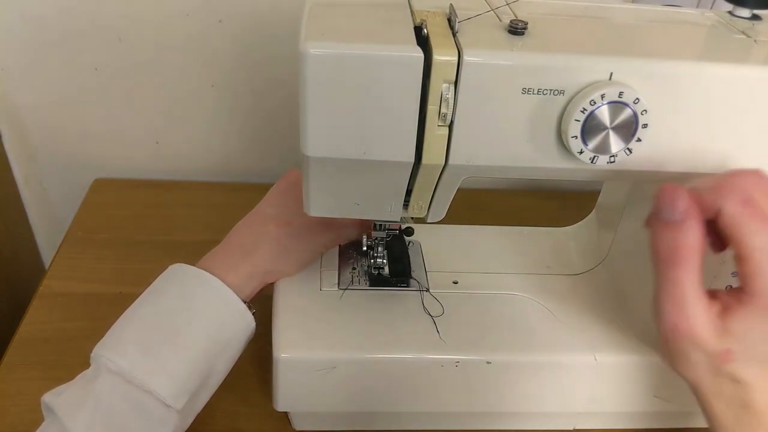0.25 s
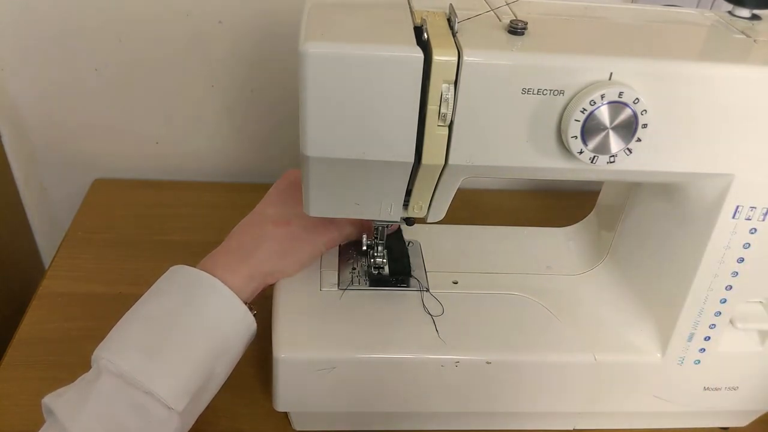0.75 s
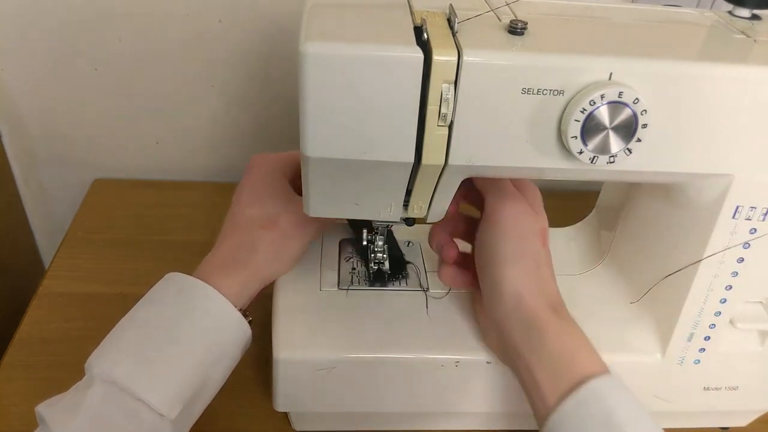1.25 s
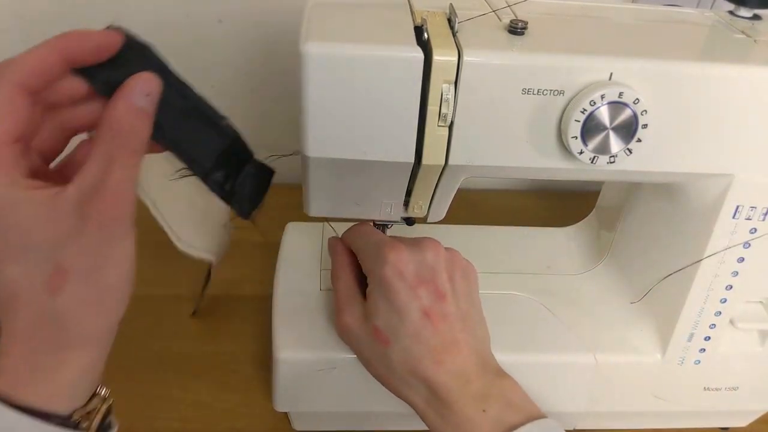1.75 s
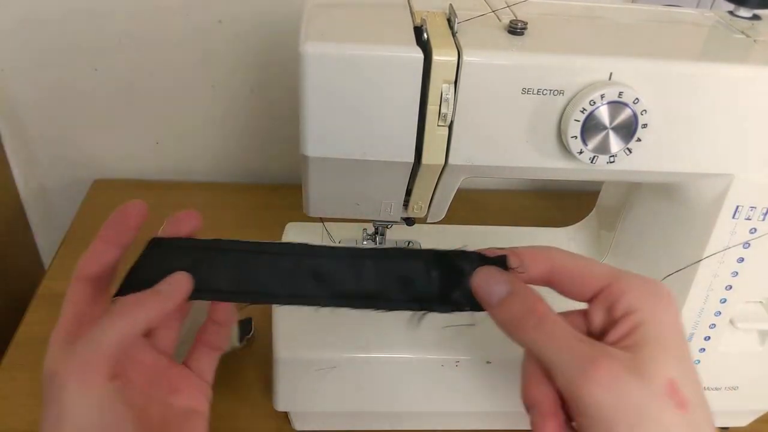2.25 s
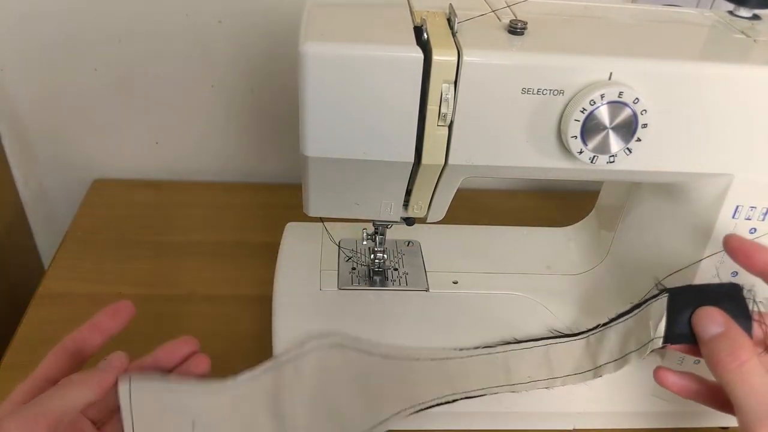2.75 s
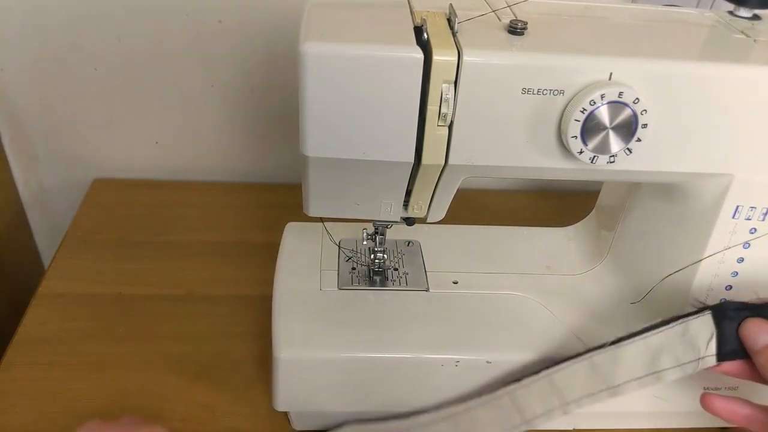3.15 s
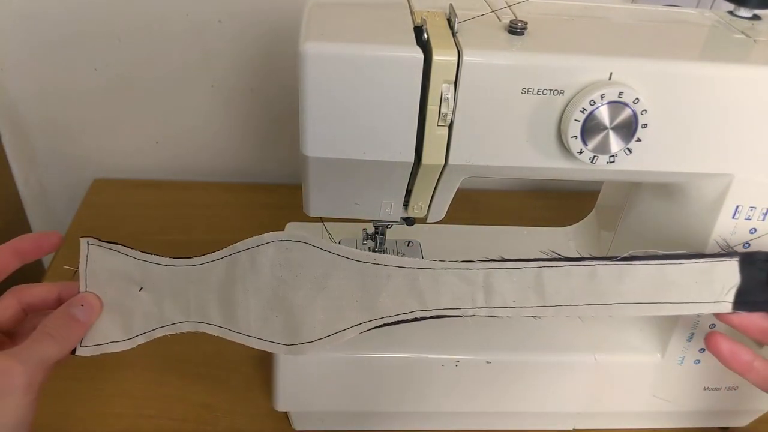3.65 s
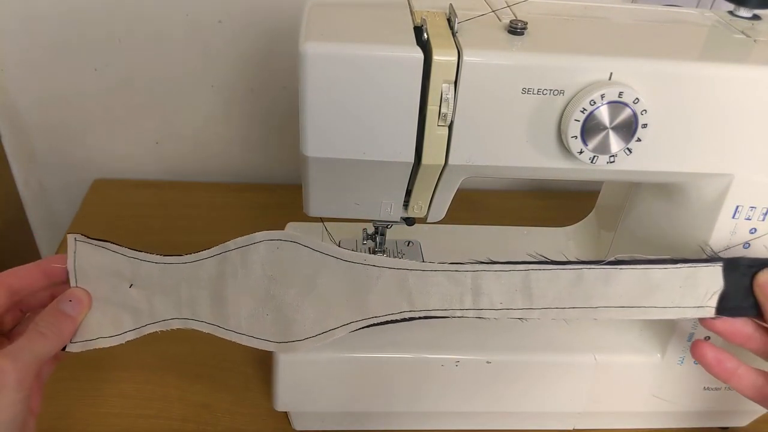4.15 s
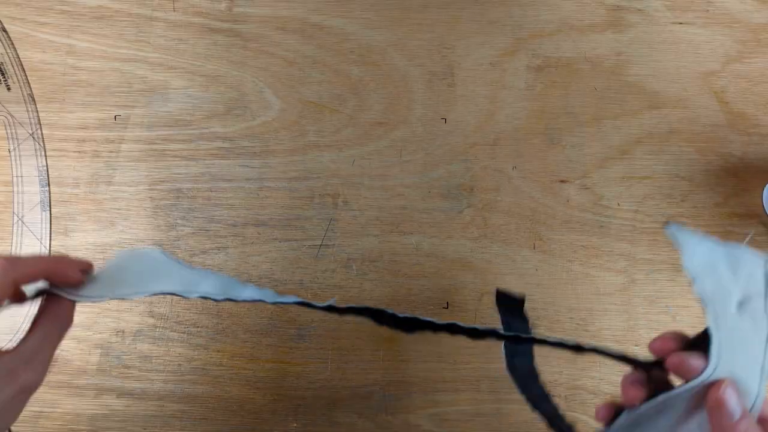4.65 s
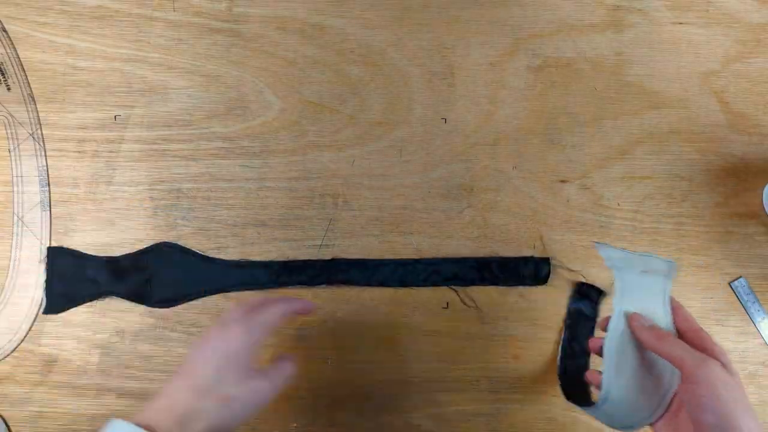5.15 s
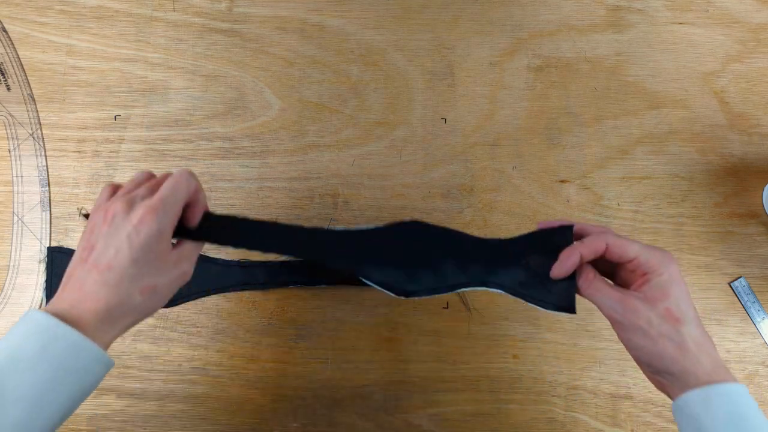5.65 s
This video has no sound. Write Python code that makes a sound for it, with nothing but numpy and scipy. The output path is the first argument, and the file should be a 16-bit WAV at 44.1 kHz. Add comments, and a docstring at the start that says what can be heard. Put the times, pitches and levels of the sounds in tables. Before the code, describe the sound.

Close steel snips and faint fabric rustle in a quiet humming room, followed by table taps, a tiny tick, and airy cloth swishes on the right.

```python
"""A quiet sewing room heard from close by: small steel scissors are handled and snip threads, cloth rustles,
the building hums low. At 4.4 s the scene changes: the sewing sounds stop and the air by a wooden table sets in
at once: its rumble and air, light taps, a tick, sliding cloth, and swishes of cloth on the right that the table
top mirrors. Friction and air are shaped noise, contacts are decaying noise bursts with rings, and the mirror is
a delayed copy of the swish."""
import sys
import numpy as np
from scipy import signal
from scipy.fft import rfft, irfft
from scipy.io import wavfile
from scipy.ndimage import uniform_filter1d, map_coordinates

SR = 44100
rng = np.random.default_rng(int(sys.argv[2]) if len(sys.argv) > 2 else 0)


def to_wav(sig):
    """Store sig (one row per channel, or 1-D mono) as 16-bit WAV at the path in sys.argv[1].

    Samples outside -1..1 are clipped; the rate is SR.
    """
    pcm = np.clip(np.atleast_2d(sig), -1, 1) * 32767
    pcm = np.round(pcm).astype(np.int16)
    wavfile.write(sys.argv[1], SR, pcm.T)  # frames by channels


def linear_from_db(decibels):
    """Turn decibels (scalar or array-like) into linear amplitude factors; 0 gives 1."""
    return 10 ** (np.asarray(decibels, float) / 20)


N = 260190
T = np.arange(N) / SR


def unit(x):
    """Power normalisation: scaled to rms 1."""
    return x / np.sqrt(np.mean(x ** 2))


def curve(rows):
    """Piecewise-linear envelope: the columns of a table joined by straight lines in time."""
    s, *columns = np.transpose(rows)
    return [np.interp(T, s, column) for column in columns]


def shape(points):
    """Transfer function: gain at every spectral line from (Hz, dB) points."""
    hz, db = np.transpose(points)
    line_hz = np.fft.rfftfreq(N, 1 / SR)
    return linear_from_db(np.interp(np.log(line_hz + 1), np.log(hz), db))


def filtered(x, points):
    """Linear filtering: the spectrum of x times the gains of (Hz, dB) points."""
    return irfft(rfft(x) * shape(points), N)


def coloured(points):
    """Spectral shaping: white noise given the spectrum of (Hz, dB) points."""
    return filtered(rng.standard_normal(N), points)


def band(x, lo_hz, hi_hz):
    """Band-pass filtering: a second-order Butterworth design, kept within 20 Hz to 20 kHz."""
    edges_hz = [max(lo_hz, 20), min(hi_hz, 20000)]
    return signal.sosfilt(signal.butter(2, edges_hz, "band", fs=SR, output="sos"), x)


def ring(x, hz, t60):
    """Modal resonance: a two-pole mode decays 60 dB in t60 s, peak near 1 for a unit blow."""
    radius, angle = np.exp(-np.log(1000) / (t60 * SR)), 2 * np.pi * hz / SR
    return signal.lfilter([0, np.sin(angle)], [1, -2 * radius * np.cos(angle), radius ** 2], x)


def walk(rate):
    """Slow random modulation: rate levels a second joined by ramps, spread about 0.4."""
    k = int(SR / rate)
    held = np.repeat(rng.standard_normal(N // k + 1), k)
    return 0.52 * uniform_filter1d(held, k)[:N]


def stroke(start, end, edge_s):
    """Smooth gating: a movement starts and stops with sine-squared edges of edge_s."""
    return np.sin(np.pi / 2 * np.clip(np.minimum(T - start, end - T) / edge_s, 0, 1)) ** 2


def clatter(t60, rise_s):
    """Granular impact: a swarm of tiny uneven contacts builds up over rise_s, then dies away."""
    t = np.arange(int(0.2 * SR)) / SR
    grit_db = 1.8 * rng.exponential(size=len(t))  # single contacts differ in strength
    contacts = unit(rng.standard_normal(len(t)) * linear_from_db(grit_db))
    after_s = np.maximum(t - rise_s, 0)
    fall = np.exp(-np.log(1000) * after_s / np.clip(t60, 0.01, 0.4))
    bite, bite_s = 0.49, 0.0042  # extra strength of the first contacts, and how fast it is gone
    fall = fall * (1 + bite * np.exp(-after_s / bite_s)) / (1 + bite)
    return contacts * np.minimum(t / rise_s, 1) ** 2 * fall


def add(out, x, s):
    """Superposition: mixes x into out from time s."""
    i = int(s * SR)
    out[i:i + len(x)] += x[:len(out) - i]


# hum spectrum: pitch_hz, level_db (per Hz, relative)
HUM_COLOUR = [(12, -41), (20, -11.5), (50, 4), (91, -2), (115, 0.5), (135, -4), (158, -16.5), (240, -17.5),
              (328, -32), (410, -27.5), (500, -32), (1090, -43), (1860, -45.5), (4300, -55), (6400, -51.5),
              (9000, -60), (12500, -62), (16000, -86.5)]
# wavering tones in the hum: pitch_hz, width_hz, level_db (relative to the hum noise)
HUM_TONES = [(50.95, 16, -17), (116, 9.6, -11), (255, 70, -24), (1550, 120, -41)]
# stereo width of the hum: pitch_hz, side_minus_mid_db
HUM_SIDE = [(60, -27.5), (200, -17), (700, -9.5), (2400, -6), (4400, 2.5), (15000, -7.5)]
# swells of the hum: time_s, level_db (of its noise, before the tones are added)
HUM_LEVEL = [(0, -51.5), (1.85, -52.5), (2.05, -49), (2.6, -50.5), (3.2, -52), (3.7, -49), (5.9, -50)]


def hum():
    """Mid and side noise: low building hum with narrow-band tones, alike in the bass, wide in the treble."""
    mid = unit(coloured(HUM_COLOUR))
    tones = 0
    for hz, width_hz, db in HUM_TONES:
        tones = tones + linear_from_db(db) * unit(band(rng.standard_normal(N), hz - width_hz / 2, hz + width_hz / 2))
    mid = mid + tones
    side = filtered(unit(coloured(HUM_COLOUR)), HUM_SIDE)
    return linear_from_db(curve(HUM_LEVEL)[0]) * (mid * linear_from_db([[-0.5], [0.5]]) + side * np.array([[1], [-1]]))


def rubbed(noise, rows, ring_db, width):
    """Friction noise: each stroke adds one broad ring, width being its half-width as a share of its pitch."""
    out = 0
    for start, end, db, hz in rows:
        i, j = int(start * SR), int(end * SR)
        grains = noise[:, i:j]
        x = np.zeros((2, N))
        x[:, i:j] = grains + linear_from_db(ring_db) * band(grains, hz * (1 - width), hz * (1 + width))
        out = out + linear_from_db(db) * stroke(start, end, min(0.07, 0.46 * (end - start))) * x
    return out


def crackle():
    """Stick-slip: gain leaps at each snapping crease and dies in a few ms."""
    per_s, size_db, decay_s = 90, -7, 0.002
    snaps = (rng.random(N) < per_s / SR) * linear_from_db(size_db) * rng.exponential(size=N)
    return 1 + signal.lfilter([1], [1, -np.exp(-1 / (decay_s * SR))], snaps)


# spectrum of rubbed cloth: pitch_hz, level_db (per Hz, relative)
CLOTH_COLOUR = [(400, -12.5), (900, -6), (1670, -5.5), (3600, -2.5), (7000, -8), (11000, -8), (14500, -11),
                (16500, -27)]


def friction():
    """Stick-slip friction: fibres and blades slip in dense grains that flicker band by band."""
    noise = np.array([unit(coloured(CLOTH_COLOUR)) for _ in range(2)])
    rubbing = rustle(noise) + rubs(noise) + grinds(noise)
    # each region of the spectrum has its own grip and its own snapping creases
    below = []
    for hz in 1500 * 1.4 ** np.arange(7):
        below.append(signal.sosfiltfilt(signal.butter(4, hz, fs=SR, output="sos"), rubbing))
    out = below[0]
    for part in np.diff(below + [rubbing], axis=0):
        grip_db = 3.5 * walk(60) + 8 * walk(22)  # quick flicker and slow patches
        out = out + part * linear_from_db(grip_db) * crackle()
    out = out * linear_from_db(2.0 * walk(45) + 1.1 * walk(300))
    mid, side = out
    return mid + linear_from_db(-21) * side * np.array([[1], [-1]])


# cloth and fingers rubbing: start_s, end_s, level_db (before ring and flicker), pitch_hz (of the ring)
RUSTLES = [(0, 0.046, -62, 7500), (0.29, 0.354, -74, 2000), (0.338, 0.467, -79.5, 5070),
           (0.427, 0.546, -65.5, 3050), (0.559, 0.705, -65, 5950), (0.657, 0.853, -81.5, 4000),
           (0.803, 0.873, -72, 2820), (0.985, 1.077, -72, 1900), (1.03, 1.18, -75.5, 4200),
           (1.153, 1.253, -71.5, 5500), (1.204, 1.343, -75, 7100), (1.509, 1.543, -63.5, 7800),
           (1.555, 1.63, -68, 2600), (1.646, 1.743, -58.5, 2480), (1.73, 1.922, -61, 2600),
           (2.12, 2.3, -79, 2410), (2.232, 2.338, -63.5, 4050), (2.307, 2.407, -70, 4620),
           (2.35, 2.525, -60.5, 2964), (2.491, 2.653, -78, 5000), (2.794, 2.847, -76, 2220),
           (2.826, 3.124, -77.5, 4500), (3.564, 3.76, -73, 4330), (3.768, 3.836, -68, 3140),
           (4.106, 4.37, -74, 3030)]


def rustle(noise):
    """Friction of fibres: cloth and fingers rub with a faint ring from what is rubbed."""
    return rubbed(noise, RUSTLES, ring_db=-3, width=0.09)


# contacts of the scissors: start_s, level_db (before the bands), pitch_hz (main ring),
# body_db (relative), t60_s (of the clatter, at least 0.01)
SNIPS = [(0.0193, -46, 7600, -21, 0.0097), (0.5946, -47, 10200, -6.5, 0.028),
         (0.617, -50.5, 9600, -8, 0.03), (0.636, -43, 6160, -11, 0.043), (0.968, -62, 2880, -2, 0.058),
         (0.996, -63, 5500, -3, 0.023), (1.014, -57.5, 2470, -8, 0.046), (1.205, -52.5, 3600, -11, 0.04),
         (1.478, -51.5, 2780, -6.5, 0.053), (1.518, -55, 7980, -10, 0.022), (1.5659, -55, 4870, -4, 0.04),
         (1.603, -57, 9500, -12, 0.03), (1.631, -43, 4000, -14, 0.069), (1.678, -42, 2080, -10, 0.094),
         (1.683, -34, 8100, -20, 0.025), (1.707, -44, 8550, -11, 0.036), (1.750, -51, 3900, -17, 0.1),
         (1.79, -45, 10500, -8, 0.036), (1.796, -38.5, 2890, -19, 0.049), (1.808, -48, 10300, -12, 0.022),
         (1.8207, -35.5, 2460, -18, 0.045), (1.84, -44, 6160, -16, 0.033), (1.8626, -53, 8500, -20, 0.064),
         (1.9732, -51, 2700, -14, 0.035), (2.2541, -28.5, 2400, -8.5, 0.049),
         (2.3783, -30, 3050, -9, 0.097), (2.3848, -26.5, 2730, -7.5, 0.086),
         (2.395, -35.5, 9040, -20, 0.056), (2.405, -39, 4990, -8, 0.048), (2.455, -50, 3000, -6, 0.072),
         (2.5965, -50.5, 3150, -15, 0.048), (2.82, -56.5, 2180, -4, 0.036), (2.987, -57, 4070, -5, 0.03),
         (3.0666, -36.5, 2420, -6, 0.041), (3.0981, -36, 2200, -1.5, 0.035),
         (3.102, -37.5, 2880, -13, 0.041), (3.109, -51, 8500, -8, 0.026), (3.237, -63, 2270, -0.5, .051),
         (3.754, -33.5, 2330, -5, 0.014), (3.7576, -28, 6900, -12, 0.018), (3.761, -35, 5930, -9, 0.019),
         (3.77, -35.5, 3090, -4.5, 0.039), (3.8414, -42, 9800, -12.5, 0.02), (4.161, -66, 2310, 9.5, 0.078),
         (4.334, -65.5, 3020, 6, 0.033)]


def scissors():
    """Impact excitation: contacts clatter in body, blade and edge bands, with main and chance rings."""
    out = np.zeros(N)
    rise_s = 0.0023
    for s, level_db, hz, body_db, t60 in SNIPS:
        octaves = np.log2(hz / 5000)
        edge_db = -4 + 2 * octaves - 0.21 * body_db  # brighter for high rings, duller for heavy bodies
        hump_db, hump_width = 2 * octaves, 0.12  # broad lift around the ring
        x = clatter(t60, rise_s)
        body = linear_from_db(body_db + 3.5) * band(band(x, 810, 4700), 780, 5700)
        blade = linear_from_db(1) * band(x, 4320, 6330)
        knock = linear_from_db(body_db - 4.5) * band(x, 1000, 1510)  # the handles' hollow knock
        edge = linear_from_db(edge_db) * band(x, 7730, 13160)
        hump = linear_from_db(hump_db) * band(x, hz * (1 - hump_width), hz * (1 + hump_width))
        wide = body + blade + knock + edge + hump
        # grip and pivot play differ at every blow, so short rings fall at new pitches
        chance = sum(ring(wide, f, 0.0083) for f in 2000 + 12500 * rng.random(size=5))
        contact = wide + linear_from_db(-29) * chance + linear_from_db(-29) * ring(x, hz, 0.012)
        add(out, linear_from_db(level_db) * contact, s - 0.65 * rise_s)
    return out


def room(x):
    """Reverberation: early scatter and a short tail, different in each ear."""
    t60_s, room_db = 0.19, -7.5
    t = np.arange(int(0.4 * SR)) / SR
    decay = np.exp(-np.log(1000) * t / t60_s) + 0.96 * np.exp(-t / 0.0088)
    tail = rng.standard_normal((2, len(t))) * decay
    tail = tail / np.sqrt(np.sum(tail ** 2, axis=1, keepdims=True))
    return linear_from_db(room_db) * signal.fftconvolve(x[None], tail, axes=1)[:, :N]


# low hollow rubs, perhaps a hand on the machine's casing:
# start_s, end_s, level_db (before ring and flicker), pitch_hz (of the ring)
HOLLOW_RUBS = [(1.09, 1.21, -74, 1080), (2.3, 2.4, -69, 1150), (2.934, 3.035, -77.5, 915),
               (3.709, 3.77, -70.5, 1140), (3.747, 3.81, -63.5, 696)]


def rubs(noise):
    """Resonant friction: low hollow rubs with a strong, broad ring."""
    return rubbed(noise, HOLLOW_RUBS, ring_db=16, width=0.24)


# blades grinding past each other: start_s, end_s, level_db (before ring and flicker), pitch_hz (of the ring)
BLADE_GRINDS = [(1.69, 1.712, -69, 3000), (1.702, 1.734, -71, 2500), (1.749, 1.775, -68, 2600),
                (1.746, 1.77, -71, 8250)]


def grinds(noise):
    """Friction-driven resonance: blades grind past each other and sing briefly in a narrow band."""
    return rubbed(noise, BLADE_GRINDS, ring_db=24, width=0.04)


# blades meeting fully: start_s, level_db (of the blow)
SHUTS = [(2.391, -52), (2.455, -62), (3.761, -60)]
# lasting ring of the steel: pitch_hz, t60_s
STEEL_RING = (7505, .2)


def blade_ring():
    """Modal resonance: blades that meet fully set off one lasting mode of the steel."""
    blows = np.zeros(N)
    for s, db in SHUTS:
        add(blows, linear_from_db([db]), s)
    return ring(blows, *STEEL_RING)


# spectrum of the air by the table: pitch_hz, level_db (per Hz, relative)
AIR_COLOUR = [(120, -13), (300, -4.5), (500, -6.5), (1230, -8.5), (2200, -13), (2800, -13), (2960, -8.5),
              (3150, -16), (16000, -30.5)]


def table_bed():
    """Shaped noise: slow rumble and air by the table; both rise while hands lean on it."""
    from_s = 4.403  # the air sets in at once, the rumble fades in
    lean = stroke(5.62, 5.98, 0.18)  # hands lean on the table while dragging
    rumble_db, air_db = -47 + 2.5 * lean, -63.5 + 2.5 * lean
    air = coloured(AIR_COLOUR)
    air = air / np.sqrt(np.mean(band(air, 400, 3500) ** 2))
    air = (T > from_s) * linear_from_db(air_db + 1.0 * walk(25)) * air
    rumble = unit(coloured([(2, -37), (5, -13), (14, 10.0), (30, -24), (120, -48), (500, -94)]))
    return air + stroke(from_s, N / SR + 1, 0.077) * linear_from_db(rumble_db) * rumble


# taps on the table: start_s, peak_db, pitch_hz (of the ring), width_hz, t60_s (at least 0.01)
TAPS = [(4.432, -55, 12400, 6000, 0.024), (4.664, -50.5, 1300, 2000, 0.028),
        (4.784, -51.5, 1210, 1800, .03), (4.86, -48, 3400, 3400, 0.17), (4.912, -42.5, 2440, 4130, 0.12),
        (5.346, -48, 720, 350, 0.14), (5.360, -42, 705, 348, 0.072), (5.546, -41, 400, 676, 0.011),
        (5.706, -44.5, 1270, 600, 0.3), (5.707, -43, 398, 400, 0.028)]


def taps():
    """Impact on wood: a band of decaying clatter led by a quicker tick, scaled to its peak."""
    out = np.zeros(N)
    for s, peak_db, hz, width_hz, t60 in TAPS:
        x = clatter(t60, rise_s=0.0028)
        tick = band(clatter(0.026, rise_s=0.00035), hz / 3, hz * 1.16)
        tap = unit(band(x, hz - width_hz / 2, hz + width_hz / 2)) + linear_from_db(-10) * unit(tick)
        add(out, linear_from_db(peak_db) * tap / np.abs(tap).max(), s - 0.001)
    return out


# a small hard thing ticks on the table: start_s, level_db (energy of the blow)
TINK_BLOW = (4.7797, -43)
# its modes: pitch_hz, level_db (relative), t60_s
TINK_MODES = [(1950, -12, .04), (3930, -2, 0.035), (4220, 4, 0.032), (5250, -11, 0.017)]


def tink():
    """Modal synthesis: a very short scuffed blow into a few short modes."""
    start_s, level_db = TINK_BLOW
    crack, blow = clatter(0.01, rise_s=0.0004), np.zeros(N)
    add(blow, linear_from_db(level_db) * crack / np.sqrt(np.sum(crack ** 2)), start_s)
    modes = sum(linear_from_db(db) * ring(blow, hz, t60) for hz, db, t60 in TINK_MODES)
    return modes + linear_from_db(3) * band(blow, 800, 7000)


# cloth swishes: start_s, end_s, level_db (before the pan), lag_start_ms, lag_end_ms (of the mirror image)
SWISHES = [(5.125, 5.33, -55.5, 0.775, 0.89), (5.612, 5.825, -54.5, 0.815, 0.755),
           (5.78, 5.935, -70, 0.6, .75)]
# spectrum of the swish: pitch_hz, level_db (per Hz, relative)
SWISH_COLOUR = [(2000, -8.5), (4000, 5.5), (6000, 7.5), (10500, 7.5), (15000, 6.5), (16500, -31)]
# reflection off the wood, which mirrors the treble best: pitch_hz, gain_db
MIRROR_COLOUR = [(3500, -11), (8500, 0), (13000, 0), (16000, -8)]


def swish():
    """Comb filtering: cloth hiss plus its mirror image off the table, the lag sliding as the hand moves."""
    noise, out = unit(coloured(SWISH_COLOUR)), 0
    mirrored = filtered(noise, MIRROR_COLOUR)
    for start, end, db, lag_from, lag_to in SWISHES:
        lag_ms = np.interp(T, [start, end], [lag_from, lag_to]) + 0.014 * walk(25)
        share = np.clip(0.8 + 0.45 * walk(22), 0, 1)  # the image is clearer when the cloth lies flat
        mirror = share * map_coordinates(mirrored, [np.arange(N) - lag_ms * SR / 1000], order=3)
        envelope = stroke(start, end, 0.044) + 0.2 * stroke(start, end + 0.099, 0.16)
        out = out + linear_from_db(db) * envelope * (noise + mirror)
    return out * linear_from_db(1.0 * walk(40)) * linear_from_db([[-22], [4]])  # left, right


# spectrum of cloth dragged on wood: pitch_hz, level_db (per Hz, relative)
SLIDE_COLOUR = [(200, -8), (420, 7), (800, -2), (1300, -6), (2200, -11), (3600, -4), (6000, -27)]


def slide():
    """Sliding friction: cloth grips the wood, swells to its peak, then falls back to a steady drag."""
    start_s, peak_s, drop_s = 5.705, 5.75, 0.049
    rise = np.clip((T - start_s) / (peak_s - start_s), 0, 1)
    settle = 1 - np.exp(-np.maximum(T - peak_s, 0) / drop_s)
    db = -50 - 10 * (1 - rise) - 8.5 * settle + 1.5 * walk(90)
    return stroke(start_s - 0.006, N / SR + 1, 0.027) * linear_from_db(db) * unit(coloured(SLIDE_COLOUR))


def scene():
    """Superposition: all sources in the two ears, the table's own sounds alike in both."""
    snips, cloth = scissors() + blade_ring(), friction()
    near = snips * linear_from_db([[-0.3], [0.3]]) + cloth + room(snips + cloth[0])
    table = table_bed() + taps() + tink() + slide()
    return hum() + near + table + swish()


def roll_off(x):
    """The treble ends steeply here."""
    return signal.sosfilt(signal.butter(12, 16490, fs=SR, output="sos"), x)


def record(dry):
    """Band limiting: a steep elliptic low-pass cuts the top above 16 kHz."""
    cut = signal.sosfilt(signal.ellip(8, 0.2, 60, 16000, fs=SR, output="sos"), dry)
    return roll_off(cut)


dry = scene()
out = record(dry)
to_wav(out)
```